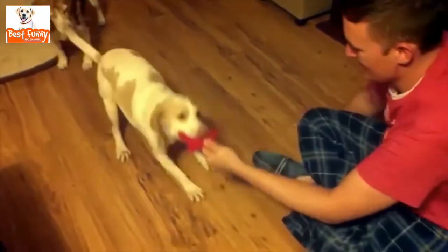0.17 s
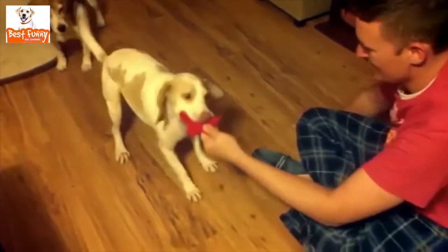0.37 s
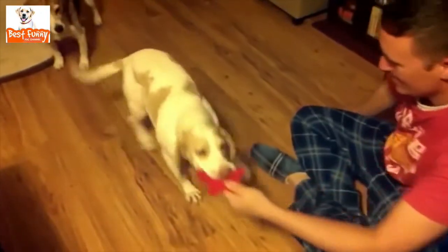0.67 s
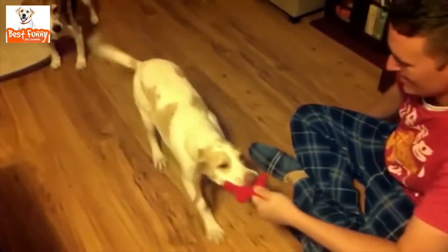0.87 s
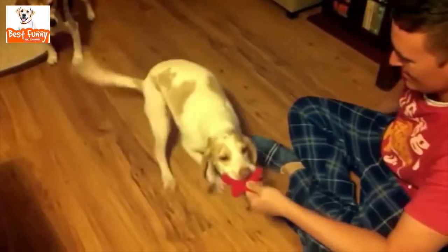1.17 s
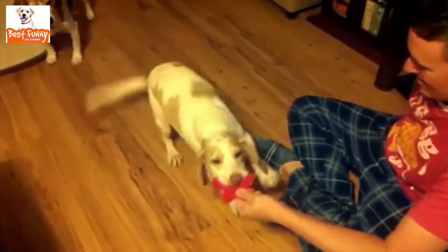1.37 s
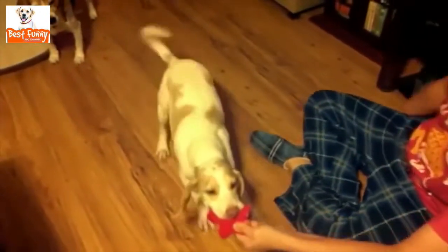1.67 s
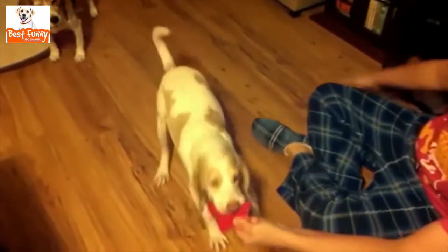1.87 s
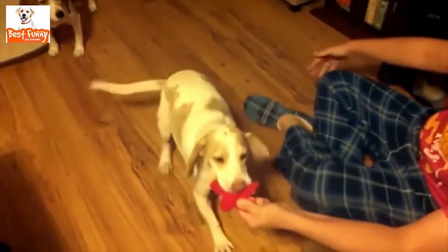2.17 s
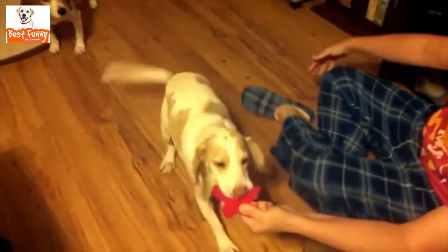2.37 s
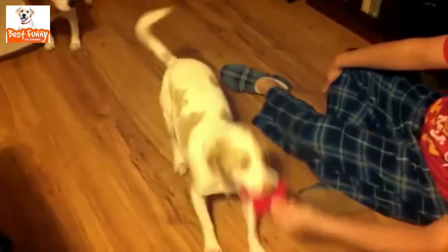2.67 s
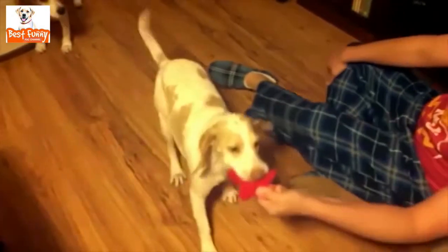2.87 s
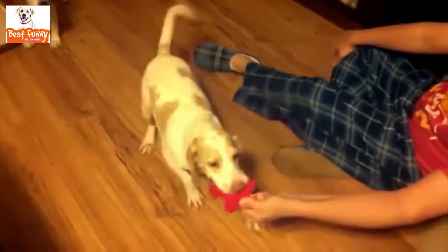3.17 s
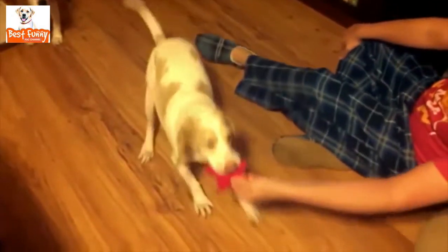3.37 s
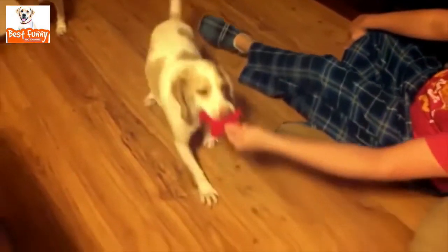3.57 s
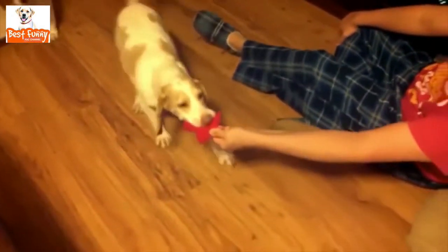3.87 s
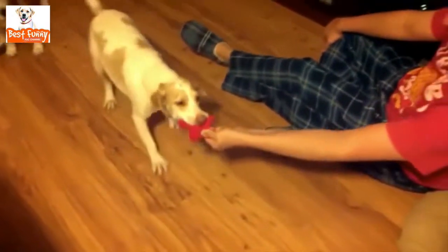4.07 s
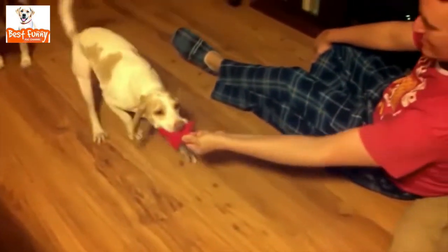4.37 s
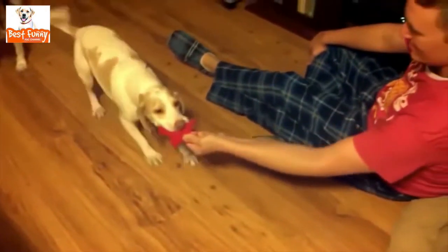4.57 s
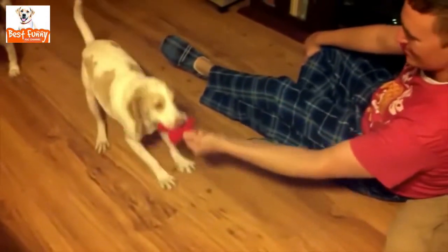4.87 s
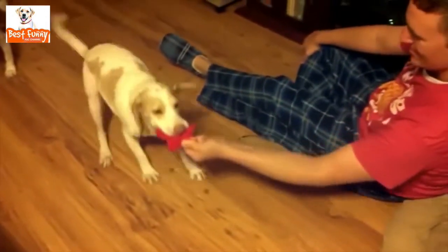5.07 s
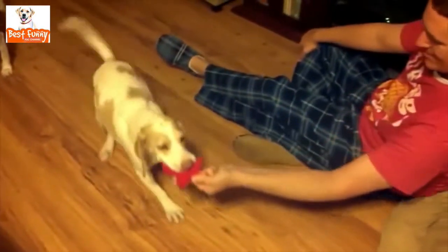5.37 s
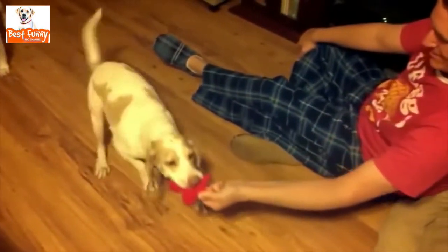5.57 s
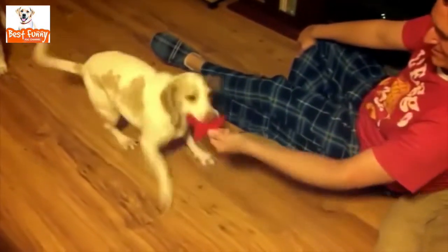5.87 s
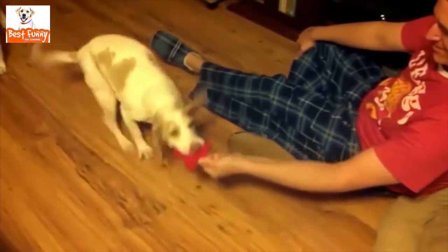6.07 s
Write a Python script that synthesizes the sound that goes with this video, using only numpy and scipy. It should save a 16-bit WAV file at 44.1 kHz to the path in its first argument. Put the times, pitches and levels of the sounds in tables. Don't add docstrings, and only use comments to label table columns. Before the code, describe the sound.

Irregular hard claw taps ring on varnished boards in a live room, mixed with scraping paw slides, soft thumps and brief signal dropouts.

```python
import sys
import numpy as np
from scipy import signal
from scipy.io import wavfile
from scipy.ndimage import uniform_filter1d, minimum_filter1d

SR = 44100
rng = np.random.default_rng(int(sys.argv[2]) if len(sys.argv) > 2 else 0)


def waveform_to_disk(signal):
    frames = np.transpose(np.atleast_2d(signal))
    scaled = np.clip(frames, -1, 1) * 32767
    samples = np.round(scaled).astype(np.int16)
    wavfile.write(sys.argv[1], SR, samples)


def gain_from_db(level_db):
    decades = np.asarray(level_db, float) / 20
    return 10 ** decades


N = 274136

# (frequency [Hz], readiness to empty [1])
STARVED = [(300, -1.4), (1000, -.5), (2300, .3), (3500, .1), (5000, -.8), (7000, -1.2)]
RESET_S, RESET_DB = 0.179, -21.5


def at_hz(points, hz):
    table_hz, values = np.array(points).T
    return np.interp(np.log(hz), np.log(table_hz), values)


def rms_one(x):
    return x / np.sqrt(np.mean(x ** 2) + 1e-20)


def drift(rate_hz):
    r = np.exp(-2 * np.pi * rate_hz / SR)
    slow = signal.lfilter([1], [1, -2 * r, r * r], rng.standard_normal(N + SR))
    return rms_one(slow[SR:])


def ring(clicks, hz, t60_s):
    r = gain_from_db(-60 / (t60_s * SR))
    w = 2 * np.pi * hz / SR
    return signal.lfilter([0, np.sin(w)], [1, -2 * r * np.cos(w), r * r], clicks + 1e-18)


def spikes(times_s, heights):
    out = np.zeros(N)
    np.add.at(out, np.clip((times_s * SR).astype(int), 0, N - 1), heights)
    return out


def bands(spectrum, per_octave):
    low_hz, high_hz = spectrum[0][0], spectrum[-1][0]
    edges = low_hz * 2 ** np.arange(0, np.log2(high_hz / low_hz) + 1 / per_octave, 1 / per_octave)
    centres = np.sqrt(edges[1:] * edges[:-1])
    white = rng.standard_normal((2, N))
    noise = []
    for k, hz in enumerate(centres):
        sos = signal.butter(2, [edges[k], edges[k + 1]], "band", fs=SR, output="sos")
        noise.append(gain_from_db(at_hz(spectrum, hz)) * signal.sosfilt(sos, white[k % 2]))
    noise = np.array(noise)
    return zip(centres, noise / np.std(noise.sum(axis=0)))


def house():
    # (frequency [Hz], level [dB per Hz])
    hum = [(24, -90), (40, -65.5), (76, -18), (149, -16), (235, -7), (333, -11.5), (571, -16.5),
           (1120, -17.5), (1870, -29), (2090, -21.5), (2540, -24), (6280, -27.5), (7000, -45),
           (9100, -77.5), (15400, -120)]
    level_db = -58.5
    common, *own = [drift(9.5), drift(7.1), drift(4.8), drift(3.7)]
    out = 0
    for k, (hz, noise) in enumerate(bands(hum[1:-2], per_octave=2)):
        out = out + noise * gain_from_db(common + own[k % 3])
    return gain_from_db(level_db) * out


def thumps():
    # (time [s], peak level [dB], frequency [Hz], t60 [s])
    pads = [(2.461, -47, 248, 0.048), (2.696, -44, 215, 0.054), (2.724, -45, 279, 0.077),
            (2.749, -41.5, 147, 0.071), (2.769, -46.5, 96.9, 0.06), (2.789, -48, 288, 0.076),
            (2.829, -34, 223, 0.022), (3.47, -47, 315, 0.055), (4.354, -42, 350, 0.055),
            (4.379, -40.5, 353, 0.069), (6.189, -50.5, 194, 0.06)]
    push = np.hanning(120) / 60
    out = 0
    for time_s, db, hz, t60_s in pads:
        pushed = np.convolve(spikes(np.array([time_s]), gain_from_db(db - 3)), push)[:N]
        out = out + ring(pushed, hz, max(t60_s, 0.02))
    return out


def sliding():
    # (time [s], level [dB])
    pull = [(0.2, -83), (0.31, -75), (0.6, -59), (0.7, -48), (0.99, -50), (1.27, -50), (1.47, -56.5),
            (1.76, -50), (2.2, -53), (2.65, -41.5), (2.8, -52.5), (3.26, -41.5), (3.4, -57), (3.85, -43),
            (4.03, -54.5), (4.5, -44.5), (5.02, -49), (5.66, -44)]
    # (time of the catch [s], level [dB], swell [s])
    skids = [
        (2.92, -40, 0.086),
        (3.09, -42.5, 0.062),
        (3.54, -39, 0.063),
        (4.36, -35, .1),
        (5.09, -41, 0.065),
        (5.25, -40, 0.094),
        (5.78, -35, 0.067),
        (5.84, -35, 0.039),
        (6.17, -43, .1),
        (6.22, -32, 0.046),
    ]
    depth_db, stop_s = 13, 0.11
    t = np.arange(N) / SR
    power = gain_from_db(2 * np.interp(t, *np.transpose(pull)))
    for catch_s, db, swell_s in skids:
        skid_s = [catch_s - swell_s, catch_s, catch_s + stop_s]
        skid_db = [db - depth_db, db, db - depth_db]
        power = power + gain_from_db(2 * np.interp(t, skid_s, skid_db, left=-200, right=-200))
    return 10 * np.log10(power)


def scrabble(modes, per_s, uneven_db):
    sizes = gain_from_db(uneven_db * np.minimum(rng.exponential(1, N), 4)) * rng.choice([-1, 1], N)
    slips = sizes * (rng.random(N) < per_s * gain_from_db(3 * drift(40)) / SR)
    dealt = rng.integers(0, len(modes), N)
    out = 0
    for k, (hz, db, t60_s) in enumerate(modes):
        out = out + gain_from_db(db) * ring(slips * (dealt == k), hz, t60_s)
    return rms_one(out)


def all_taps():
    # (time [s], peak level [dB], board knock re peak [dB], room tail re peak [dB])
    wide = [(0.159, -17, -14.5, -15), (0.1667, -31, -9, -22), (0.1698, -18, -10, -16.5),
            (0.632, -42.5, -11.5, -8), (1.2953, -37, 2, -12), (2.4497, -22.5, -12.5, -10),
            (4.0794, -30, -12, -14.5), (4.2838, -30, -28, -7.5), (4.3754, -32, -30, -18),
            (5.254, -16, -16, -19), (5.5563, -26, -14, -20), (5.7679, -22.5, -30, -16.5)]
    middle = [(0.7, -41, -2.5, -19.5), (0.8694, -31.5, -11, -10.5), (1.3082, -27, -23, -26),
              (1.492, -28.5, -18, -21), (1.5188, -12.5, -13, -17.5), (1.712, -33.5, -11.5, -14),
              (1.8768, -34.5, -23.5, -12), (2.2214, -28.5, -9, -14), (2.468, -27, -20, -20),
              (3.286, -39.5, -27, -9), (3.7617, -28.5, -8, -12), (3.7994, -26.5, -12, -20),
              (4.0517, -25.5, -25, -12.5), (4.3567, -20, -13.5, -20), (4.7488, -24, -16, -15),
              (5.0337, -33, -21, -12), (5.0708, -23, -11, -19.5), (5.0874, -27.5, -29, -22.5),
              (5.2744, -28, -11.5, -13.5), (5.3284, -26.5, -11.5, -11.5), (5.5337, -36, -24, -8),
              (5.68, -37.5, -14, -10), (5.7402, -33.5, -6, -15.5), (5.7566, -28.5, -36, -10.5),
              (5.7794, -28.5, -13, -15), (5.8179, -23.5, -10.5, -16), (5.828, -22, -21, -24),
              (6.0488, -23, -11, -18.5)]
    narrow = [(0.7876, -13.5, -12.5, -16.5), (1.0814, -40.5, -27, -9), (1.836, -43, -27, -7),
              (2.2115, -31, -7.5, -12.5), (2.36, -30, -15.5, -12), (2.8747, -28.5, -15, -10.5),
              (3.0988, -18.5, -6.5, -17.5), (3.4385, -37.5, -16, -7), (3.49, -33, -24, -10.5),
              (3.5603, -20.5, -15, -15.5), (4.2734, -36, -22, -20), (4.3238, -29, -24, -13),
              (4.5, -32.5, -19, -16.5), (4.6137, -17, -16.5, -19.5), (4.634, -36, -14, -22),
              (4.7316, -22.5, -13, -15), (5.347, -35, -13.5, -10), (5.9983, -30.5, -12, -9.5),
              (6.0274, -25.5, -15.5, -13.5), (6.1789, -31.5, -8, -13), (6.2094, -30, -27, -19)]
    boards = [(wide, 900), (middle, 1153), (narrow, 1680)]
    return np.array([(*row, hz) for rows, hz in boards for row in rows])


def taps(modes, peak_db, spread_s, claws=4):
    shape = (len(peak_db), claws)
    late_s = spread_s * rng.random(shape) * (np.arange(claws) > 0)
    times_s = all_taps()[:, :1] + 0.001 + late_s
    out = 0
    for hz, level_db, t60_s in modes:
        luck_db = 2 * rng.standard_normal(shape)
        sign = np.sign(rng.standard_normal(shape))
        lateness_db = -4140 * abs(late_s - 0.0012)
        strength = gain_from_db(peak_db[:, None] + level_db + lateness_db + luck_db) * sign
        out = out + ring(spikes(times_s.ravel(), strength.ravel()), hz, t60_s)
    return out


def echoed(x):
    # (delay [s], level [dB])
    reflections = [(.0065, -12), (.012, -11), (.019, -11), (.027, -14), (.037, -15)]
    out = x.copy()
    for delay_s, db in reflections:
        out += gain_from_db(db) * np.r_[np.zeros(round(delay_s * SR)), x][:N]
    out[round(RESET_S * SR):round((RESET_S + 0.1) * SR)] *= gain_from_db(RESET_DB)
    return out


def room(spectrum, tail_db_at, steady_db, flutter_db, per_octave):
    # (frequency [Hz], t60 [s])
    room_t60 = [(600, 0.4), (1500, 0.48), (3500, 0.59), (7000, 0.49)]
    times_s = all_taps()[:, 0] + 0.0025
    reset = round(RESET_S * SR)
    lumps = [drift(100), drift(60), drift(60)]
    out = 0
    for k, (hz, noise) in enumerate(bands(spectrum, per_octave)):
        keep = gain_from_db(-120 / (at_hz(room_t60, hz) * SR))
        tail_db = tail_db_at(hz) + 1.3 * rng.standard_normal(len(times_s))
        fed = uniform_filter1d(spikes(times_s, gain_from_db(2 * tail_db)), size=360) + 1e-18
        before, state = signal.lfilter([1], [1, -keep], fed[:reset], zi=[0.])
        after, state = signal.lfilter([1], [1, -keep], fed[reset:], zi=state * gain_from_db(2 * RESET_DB))
        energy = np.abs(np.r_[before, after]) + gain_from_db(2 * steady_db)
        lumpy = gain_from_db(flutter_db * (lumps[0] + lumps[1 + k % 2]))
        out = out + noise * lumpy * np.sqrt(energy)
    return out


def scene():
    # (frequency [Hz], level [dB], t60 [s])
    claw_modes = [(2880, -7, 0.0053), (3760, -7, 0.011), (4600, -12, 0.0029), (4890, 1, 0.0051),
                  (5880, 0.5, 0.0065), (6597, 5.5, 0.0057)]
    board_modes = [(884, -1, .02), (1050, -1.5, 0.0064), (1642, 2, 0.017), (1810, -15.5, 0.0088)]
    # (frequency [Hz], level [dB per Hz])
    bright_colour = [(1180, -44), (2000, -12), (2530, -7.5), (2860, -8.5), (3690, -4.5), (5830, -1.5),
                     (6610, -2.5), (7000, -12.5), (9100, -35), (15400, -120)]
    dull_colour = [(260, -42.5), (450, -15), (571, -9), (1070, -1), (1470, -3.5), (1700, -7.5),
                   (1800, -3.5), (2400, -17), (3120, -35.5), (5280, -120)]

    time_s, peak_db, knock_db, tail_db, board_hz = all_taps().T
    tilt_db_per_oct = -1.5 - 0.1526 * knock_db + 0.02 * (peak_db + 28.5)
    slide_db = sliding()
    grain_db = -53.5 + 0.52 * (slide_db + 49.5)

    def bright_tail_db(hz):
        return peak_db + tail_db + tilt_db_per_oct * np.log2(hz / 5000)

    def dull_tail_db(hz):
        octaves_off = np.minimum(abs(np.log2(hz / board_hz)), 0.3)
        return peak_db + tail_db + 0.7 * knock_db + 4.5 - 26 * octaves_off

    claw = echoed(taps(claw_modes, peak_db - 8.5, spread_s=0.003))
    claw = claw + gain_from_db(slide_db - 13) * scrabble(claw_modes, per_s=1400, uneven_db=3.5)
    board = echoed(taps(board_modes, peak_db + knock_db - 12, spread_s=0.00386))
    board = board + gain_from_db(grain_db - 13) * scrabble(board_modes, per_s=300, uneven_db=1)
    bright = room(bright_colour[1:-2], bright_tail_db, slide_db - 7.5, flutter_db=-0.5, per_octave=4)
    dull = room(dull_colour[1:-2], dull_tail_db, grain_db - 9, flutter_db=0.97, per_octave=5)
    return (house() + thumps() + dull + bright + board + claw)[None]


def blotches(shape, frames, lines):
    along_time = uniform_filter1d(rng.standard_normal(shape), size=frames, axis=1)
    return rms_one(uniform_filter1d(along_time, size=lines, axis=0))


def thin_out(x, margin, depth_db, contrast):
    hz, _, cells = signal.stft(x, SR, nperseg=2048)
    ready = at_hz(STARVED, hz + 1)[:, None]
    empty = blotches(cells.shape, frames=9, lines=4) + ready > margin
    power = np.abs(cells) ** 2 + 1e-20
    favour = (power / uniform_filter1d(power, size=9, axis=0)) ** contrast
    cells = cells * favour * np.where(empty, gain_from_db(depth_db), 1)
    return signal.istft(cells, SR, nperseg=2048)[1][:N]


def starve(x, margin, depth_db):
    hz, _, cells = signal.stft(x, SR, nperseg=1024)
    level_db = 10 * np.log10(np.sum(np.abs(cells[35:]) ** 2, axis=0) + 1e-14)
    rise = np.clip(np.r_[level_db[2:] - level_db[:-2], 0, 0] / 12, 0, 1)
    held = -minimum_filter1d(-rise, size=4)
    after = np.r_[0, 0, 0, held][:len(rise)]
    ready = at_hz(STARVED, hz + 1)[:, None]
    empty = blotches(cells.shape, frames=2, lines=6) + 0.8 * ready + 3.3 * rise > margin
    empty |= blotches(cells.shape, frames=4, lines=6) + 1.6 * ready + 2.6 * after > margin
    return signal.istft(cells * np.where(empty, gain_from_db(depth_db), 1), SR, nperseg=1024)[1][:N]


def dropout_gain_db():
    # (start [s], end [s], first level [dB], last level [dB])
    dropouts = [(0, 0.132, -73, -73), (0.147, 0.148, 0, 2), (2.278, 2.33, -17, -45),
                (2.333, 2.367, -93, -71), (2.37, 2.375, -27, -30), (2.418, 2.433, -10, -26),
                (2.525, 2.543, -13, -15.5), (3.396, 3.409, -11, -15), (3.482, 3.497, -10, -19),
                (4.437, 4.47, -15.5, -41), (4.473, 4.512, -35, -30), (4.505, 4.514, -23, -10)]
    t = np.arange(N) / SR
    gain_db = np.zeros(N)
    for start_s, end_s, first_db, last_db in dropouts:
        dip_db = np.interp(t, [start_s, end_s], [first_db, last_db], left=0, right=0)
        gain_db = np.minimum(gain_db, dip_db)
    return minimum_filter1d(gain_db, size=120)


def band_limit(x):
    return signal.sosfilt(signal.butter(12, 15300, fs=SR, output="sos"), x)


def record(dry):
    gain_db = dropout_gain_db()
    thinned = thin_out(dry[0], margin=1.35, depth_db=-30, contrast=0.15)
    starved = starve(thinned, margin=3.4, depth_db=-25)[None]
    linked = starved * gain_from_db(uniform_filter1d(gain_db, size=60))
    top_cut = signal.ellip(12, 0.3, 66, 6890, fs=SR, output="sos")
    narrow = signal.sosfilt(top_cut, linked)
    low_cut = signal.butter(3, 115, "high", fs=SR, output="sos")
    picked = signal.sosfilt(low_cut, narrow + 0.021 * narrow ** 2)
    hiss = gain_from_db(-93.5) * rng.standard_normal(dry.shape) * (gain_db > -50)
    return band_limit(picked + hiss)


dry = scene()
out = record(dry)
waveform_to_disk(out)
```